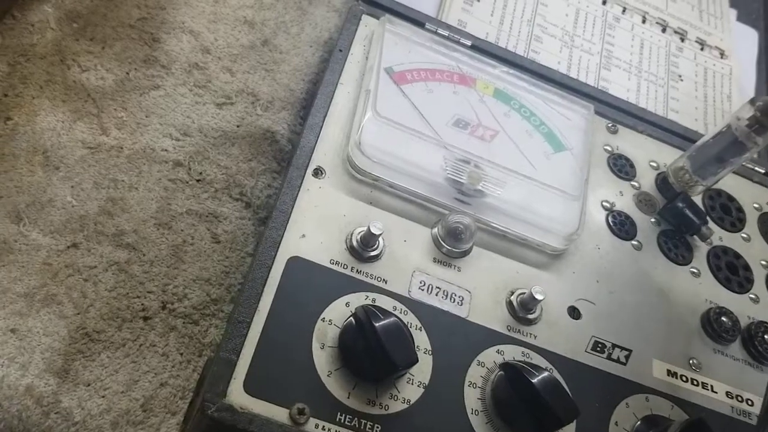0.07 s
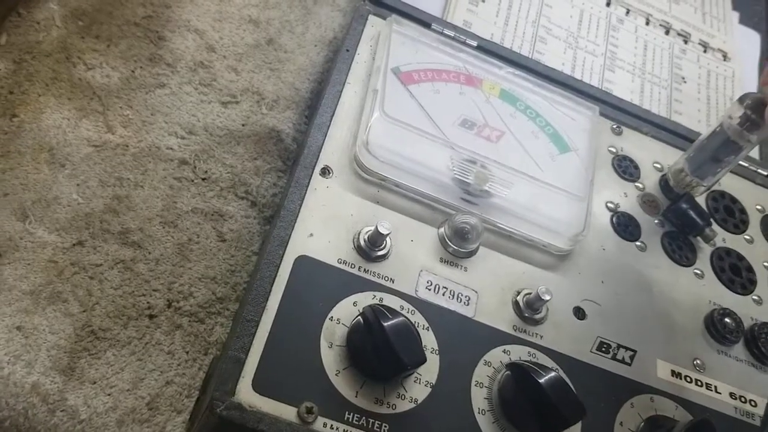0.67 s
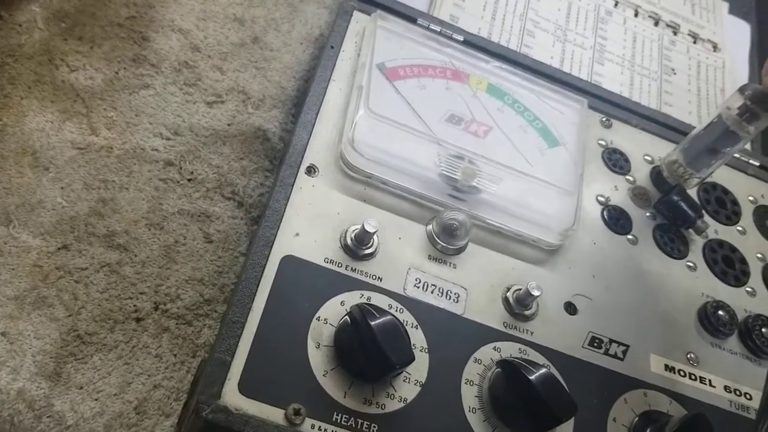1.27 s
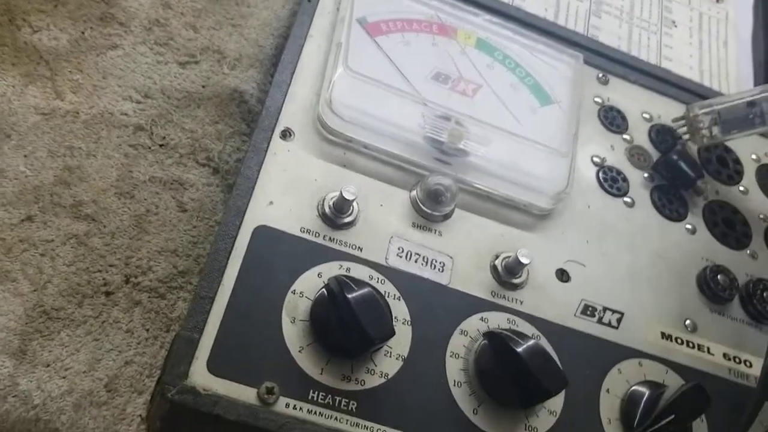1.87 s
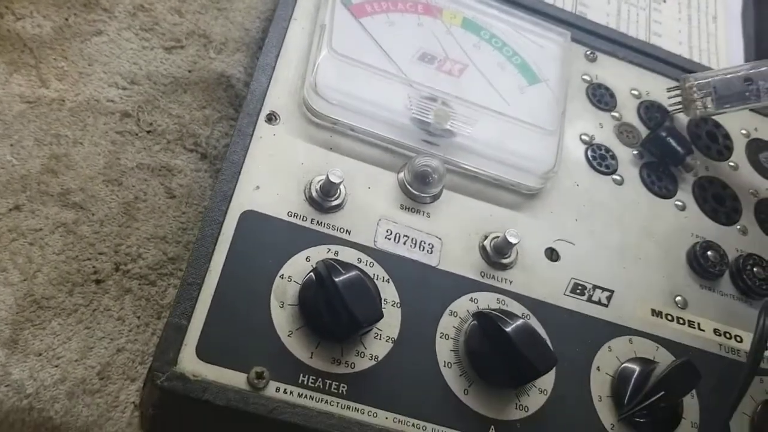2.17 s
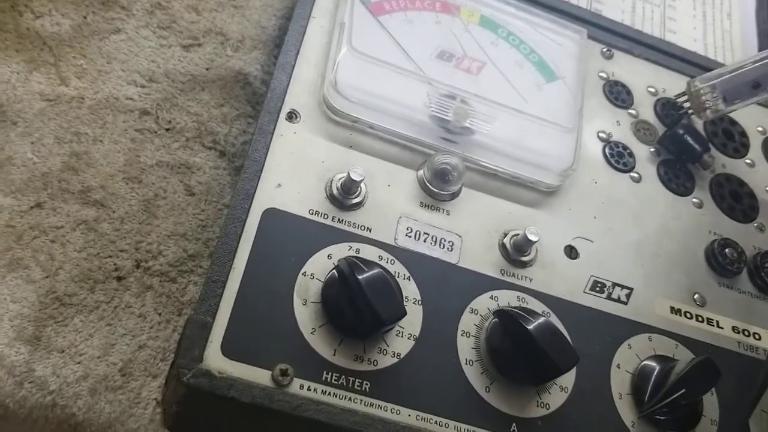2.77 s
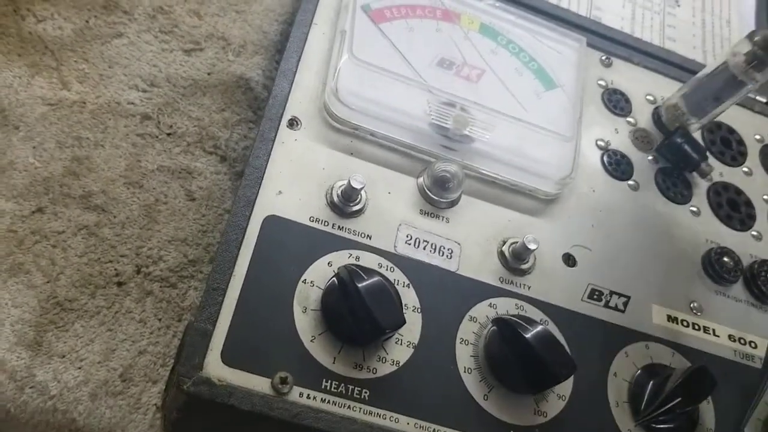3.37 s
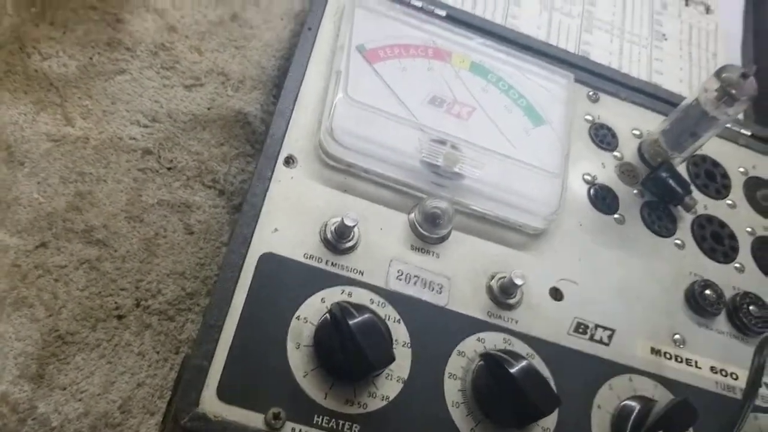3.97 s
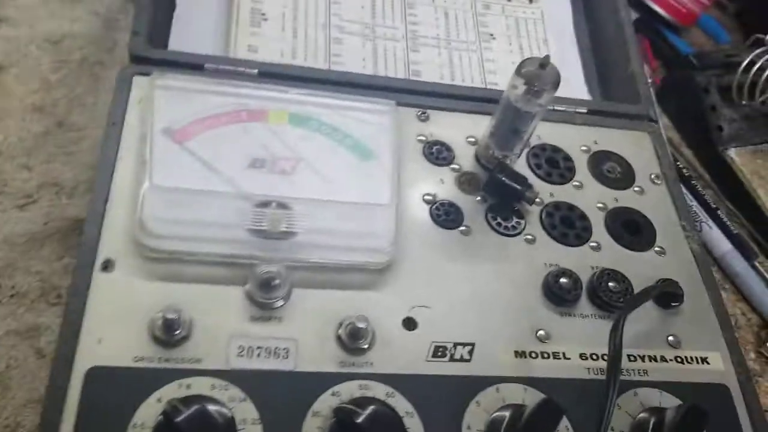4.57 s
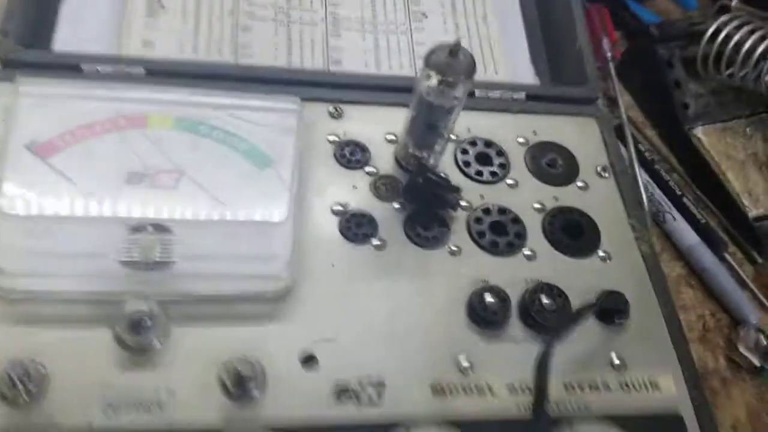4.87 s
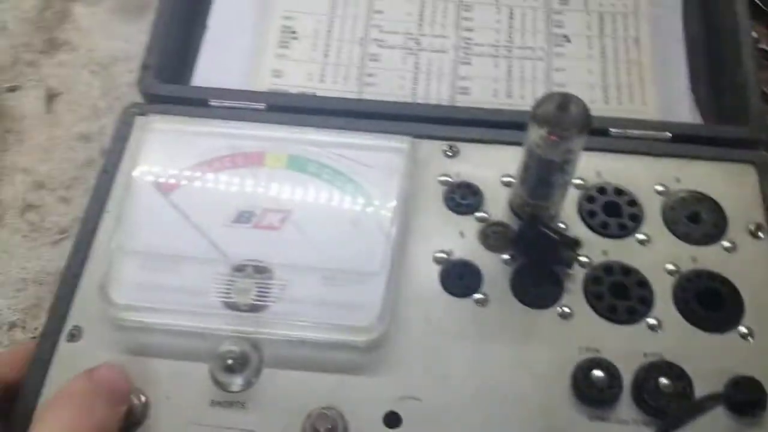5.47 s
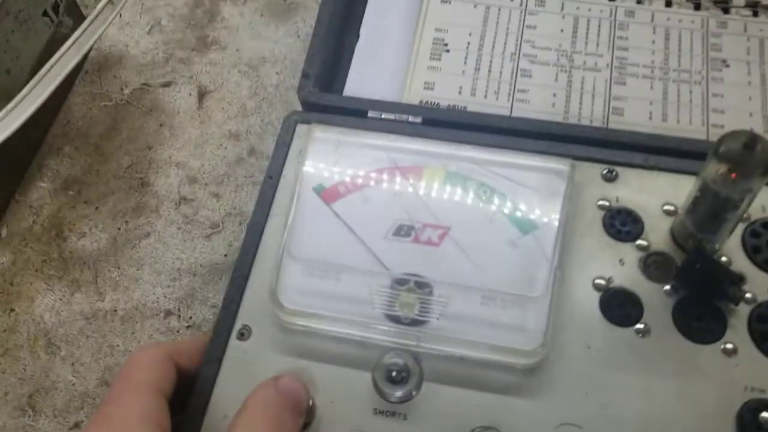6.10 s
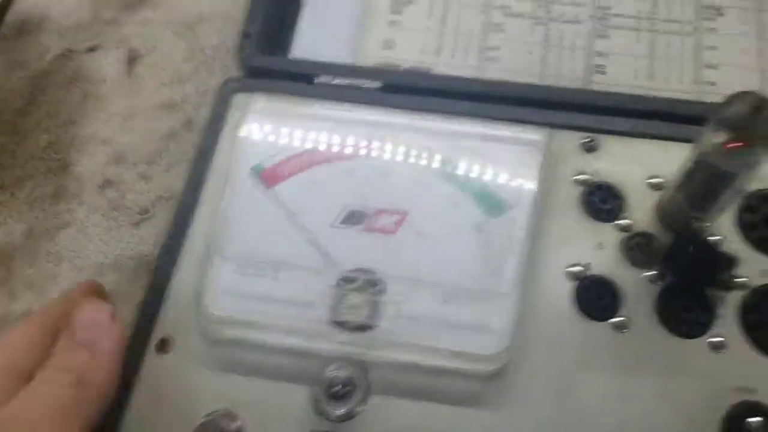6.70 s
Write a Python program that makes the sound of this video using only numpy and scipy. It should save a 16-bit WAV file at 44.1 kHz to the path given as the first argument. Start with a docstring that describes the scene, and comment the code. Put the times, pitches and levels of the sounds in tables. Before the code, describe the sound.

Small, uneven metallic clicks and hollow taps come from a glass valve's pins feeling for a socket, close up in a small room, over a quiet electrical hum. Soft finger rustle on the hand-held microphone builds into a brief cluster of loud pops on the left side. Afterwards a sprung button on the tester snaps with a dull thud, and about a second later gives a sharper clack, its spring buzzing and its stem scraping.

```python
"""A valve tester hums on a workbench while a hand feels for a socket with the pins of a glass valve.
For 4 s the pins tick, knock and skid on the panel; three times one slips off an edge and pings.
From about 1.5 s fingers slide on the hand-held stereo microphone; near 4.9 s they bump its left port.
At 5.5 s a thumb lands on the case with one snap of a sprung push button.
At 6.5 s the button clacks, its spring sizzles and its stem scrapes."""
import sys
import numpy as np
from scipy import signal
from scipy.fft import rfft, irfft, next_fast_len
from scipy.io import wavfile

SR = 44100
rng = np.random.default_rng(int(sys.argv[2]) if len(sys.argv) > 2 else 0)


def generate_wav(sig):
    """Save sig (samples, or channels by samples) to the path in sys.argv[1] as 16-bit PCM at SR."""
    pcm = np.round(np.clip(np.atleast_2d(sig).T, -1, 1) * 32767).astype(np.int16)
    wavfile.write(sys.argv[1], SR, pcm)


N = 297051
TIME_S = np.arange(N) / SR
HIT_S = TIME_S[:SR // 3]

# Ring of the button's metal. Each row: frequency in Hz, relative level in dB.
BUTTON_SPECTRUM = [(300, -22), (900, -9), (1400, -20), (2100, 4.5), (3000, 8.5), (5600, 6), (7200, 7),
                   (8800, -33), (11500, -9), (14000, -16), (15500, 4)]


def from_db(db):
    """Decibels to gain."""
    return 10 ** (np.asarray(db) / 20)


def at_hz(points, hz):
    """Interpolate on a log-frequency axis."""
    points_hz, values = np.transpose(points)
    return np.interp(np.log(hz + 1), np.log(points_hz), values)


def in_time(rows):
    """A curve's columns at every sample."""
    times_s, *columns = np.transpose(rows)
    return [np.interp(TIME_S, times_s, column) for column in columns]


def noise(spectrum, size=N):
    """Coloured noise, rms 1. Each spectrum row: frequency in Hz, relative level in dB."""
    padded = next_fast_len(size)
    gain = from_db(at_hz(spectrum, np.fft.rfftfreq(padded, 1 / SR)))
    x = irfft(rfft(rng.standard_normal(padded)) * gain, padded)[:size]
    return x / x.std()


def resonance(hz, width_hz):
    """Friction noise in one narrow band whose centre may move, rms 1."""
    lowpass = signal.butter(2, width_hz / 2, fs=SR, output="sos")
    slow = signal.sosfilt(lowpass, rng.standard_normal((2, N)))
    phase = 2 * np.pi * np.cumsum(hz * np.ones(N)) / SR
    x = slow[0] * np.cos(phase) + slow[1] * np.sin(phase)
    return x / x.std()


def flutter(rate_hz, depth_db):
    """Randomly wandering gain."""
    steps = rng.standard_normal(4096)
    return from_db(depth_db * np.interp(TIME_S * rate_hz, np.arange(len(steps)), steps))


def swell(at_s, attack_s, hold_s, release_s, db):
    """Stroke gain: rises 20 dB per attack until at_s, holds, falls 20 dB per release."""
    decades = np.maximum((at_s - TIME_S) / attack_s, (TIME_S - at_s - hold_s) / release_s)
    return from_db(db - 20 * np.clip(decades, 0, 10))


def fade(t60_s):
    """Exponential decay after a hit."""
    return np.exp(-np.log(1000) * HIT_S / t60_s)


def ring(hz, t60_s):
    """One damped mode."""
    return np.sin(2 * np.pi * hz * HIT_S) * fade(t60_s)


def burst(spectrum, t60_s):
    """Crowded modes dying together, peak near 1."""
    return noise(spectrum, size=len(HIT_S)) * fade(t60_s) / 2


def placed(x, right_db):
    """Stereo: left port at full level, right port offset."""
    return x * from_db([[0], [right_db]])


def add(track, at_s, sound):
    """Mix a sound into a track."""
    start = round(at_s * SR)
    track[..., start:start + sound.shape[-1]] += sound[..., :N - start]


def workshop(x, wet_db, build_s):
    """Add dense bench and room reflections, different at each port."""
    # Each row: frequency in Hz, t60 in seconds.
    decay_times = [(100, 0.31), (400, 0.2), (1000, 0.27), (2700, 0.33), (7000, 0.21), (15000, 0.19)]
    hz = np.fft.rfftfreq(len(HIT_S), 1 / SR)
    white = rfft(rng.standard_normal((2, len(HIT_S))))
    edges_hz = np.geomspace(90, 18000, 9)
    tail = np.zeros((2, len(HIT_S)))
    for low_hz, high_hz in zip(edges_hz, edges_hz[1:]):
        band = irfft(white * ((hz >= low_hz) & (hz < high_hz)), len(HIT_S))
        tail += band * fade(at_hz(decay_times, np.sqrt(low_hz * high_hz)))
    tail *= 1 - np.exp(-HIT_S / build_s)
    tail /= np.sqrt(np.sum(tail ** 2) / 2)
    return x + from_db(wet_db) * signal.fftconvolve(x, tail, axes=1)[:, :N]


def background():
    """Room rumble, mostly common to both ports, and each port's own hiss."""
    # Each row: frequency in Hz, relative level in dB.
    rumble_spectrum = [(15, -11), (30, -6), (48, 4.5), (80, 4), (110, -3.5), (160, -10.5), (250, -23.5),
                       (400, -25), (800, -42), (2000, -73.5)]
    left_spectrum = [(200, -9), (1000, -12.5), (2700, -11.5), (3600, -10), (4600, -12), (5400, -2.5),
                     (6300, 1.5), (7200, -4.5), (8300, -25.5), (9500, -29.5), (11000, -11.5), (12500, -7),
                     (14500, -13.5), (16000, -9.5)]
    right_spectrum = [(200, 3.5), (1000, 3), (3000, -2), (4500, -6.5), (6800, -7.5), (8300, -16.5),
                      (9800, -14), (12000, 0), (16000, -4.5)]
    # The left hiss dips after the grip changes. Each row: time in seconds, rms level in dB.
    left_levels = [(0, -62), (1.2, -62), (4.9, -60.5), (5.3, -62), (6, -65), (6.74, -62.5)]
    common = placed(from_db(-57) * noise(rumble_spectrum), right_db=-2.5)
    diffuse = from_db(-65) * np.array([noise(rumble_spectrum) for port in "LR"])
    left_db, = in_time(left_levels)
    hiss = np.array([from_db(left_db) * noise(left_spectrum), from_db(-74) * noise(right_spectrum)])
    return common + diffuse + hiss


def transformer_hum(mains_hz=59.82):
    """The core flexes twice per mains cycle; each partial wanders as the microphone moves."""
    # Each row: multiple of the mains frequency, rms level in dB.
    partials = [(1, -73), (2, -55), (3, -72.5), (4, -75.5), (5, -74), (6, -84), (7, -86), (8, -82.5),
                (10, -98.5), (12, -92)]
    hum = np.zeros(N)
    for multiple, db in partials:
        wander = flutter(1.475, depth_db=1.1 if multiple == 2 else 2.6)
        hum += from_db(db) * wander * np.sin(2 * np.pi * (multiple * mains_hz * TIME_S + rng.random()))
    return placed(np.sqrt(2) * hum, right_db=-6)


def microphone_bumps():
    """A fingertip cracks on the port, pops its cavity, pushes in air and drags; no room is heard."""
    # Each row: start in seconds, thump in dB, pop in dB, pop in Hz, crack in dB, left minus right in dB.
    bumps = [(4.75, -47, -49.5, 600, -46, -18), (4.7618, -52, -42, 592, -30, 16),
             (4.7662, -36, -31, 400, -27, 24), (4.7678, -35, -37, 600, -24, 22),
             (4.7726, -23.5, -28, 496, -23.5, 21), (4.877, -41.5, -30.5, 704, -14, 23),
             (4.8808, -34, -7, 660, -12, 25.5), (4.882, -16, -15, 913, -5.5, 22.5),
             (4.8986, -35, -28, 350, -11.5, 22), (4.9009, -36, -6.5, 390, -24, 19.5),
             (4.9037, -18, -4.5, 1403, -13, 29), (4.9056, -23, -9, 380, -30, 24),
             (4.907, -19, -10.5, 737, -24, 25), (4.9167, -4.5, -8.5, 800, -2, 29),
             (5.0645, -70, -32.5, 3420, -45, -5.5), (5.111, -75, -45, 5200, -52, -8)]
    # Each row: frequency in Hz, relative level in dB.
    crack_spectrum = [(400, 0), (2000, 3), (3700, 2.5), (5200, 4.5), (7200, 6), (8300, -23), (10000, -18),
                      (13500, -2.5), (16000, -20)]
    judder_spectrum = [(60, -18.5), (250, -2.5), (700, -5.5), (1500, -19), (4000, -35)]
    thump_hz, t60_cycles = 133, 3.6
    seal_lag_s = 0.00155  # the pad seals the port just after the nail's crack
    drag_from_s, drag_to_s, drag_end_db, rise_db_per_s = 4.875, 4.9175, -35.5, 133.5
    hits = np.zeros((2, N))
    for at_s, thump_db, pop_db, pop_hz, crack_db, left_db in bumps:
        crack = burst(crack_spectrum, t60_s=0.004)
        crack *= from_db(crack_db) / abs(crack).max()
        pop = from_db(pop_db) * ring(pop_hz, t60_cycles / pop_hz)
        thump = from_db(thump_db) * ring(thump_hz, t60_cycles / thump_hz)
        add(hits, at_s, placed(pop + crack, -left_db))
        add(hits, at_s + seal_lag_s, placed(thump, -left_db))
    touching = (TIME_S > drag_from_s) & (TIME_S < drag_to_s)
    drag_db = drag_end_db - rise_db_per_s * abs(drag_to_s - TIME_S)
    drag = touching * from_db(drag_db) * noise(crack_spectrum)
    hardest_press = swell(4.9025, attack_s=0.0033, hold_s=0.0092, release_s=0.012, db=-21)
    judder = hardest_press * noise(judder_spectrum)
    port_leak = signal.butter(1, 45, "high", fs=SR, output="sos")
    return signal.sosfilt(port_leak, hits + placed(drag + judder, right_db=-29.5))


def stick_slip(slips_per_s=45, slip_db=3):
    """Friction gain: steady sliding plus uneven scratches as skin ridges catch and let go."""
    slips = (rng.random(N) < slips_per_s / SR) * rng.random(N)
    return 0.83 + from_db(slip_db) * signal.fftconvolve(slips, fade(t60_s=0.012))[:N]


def finger_rub():
    """Skin slides on the housing: grainy hiss, low rustle and a whistle from the left port's resonance."""
    # Each row: time, attack, hold and release in seconds, then hiss, rustle,
    # right-port hiss offset and whistle in relative dB.
    strokes = [(1.598, 0.34, 0.16, 0.15, -48.5, -95, -10.5, -54.5),
               (1.92, 0.079, 0.018, 0.27, -53.5, -67, -13, -69),
               (2.857, 0.3, 0.095, 0.5, -53.5, -73, -12.5, -61.5),
               (3.953, 0.046, 0.068, 0.26, -49, -65.5, -7.5, -61),
               (4.116, .03, 0.017, 0.043, -54.5, -69, -10, -77),
               (4.208, 0.04, 0.027, 0.08, -52.5, -60, -16, -80), (4.33, .03, .03, .05, -57, -68, -16, -80),
               (4.42, 0.047, 0.053, 0.2, -42, -71, -10, -55),
               (4.647, 0.052, 0.16, 0.082, -71.5, -51.5, -13, -78),
               (4.854, 0.096, .02, 0.089, -49, -45.5, -5, -80),
               (4.998, 0.22, 0.066, 0.25, -62, -59, 1, -81), (6.44, 0.14, 0.07, 0.12, -60, -61.5, -1, -80)]
    # Each row: frequency in Hz, relative level in dB.
    left_spectrum = [(800, -49), (2000, -28), (3100, -28.5), (3800, -13.5), (5500, -7.5), (6800, -2.5),
                     (7700, -14), (9000, -21.5), (11000, -14.5), (13000, -15.5), (16000, -17.5)]
    right_spectrum = [(800, -26), (4000, -13.5), (5200, -3.5), (7000, 1), (8200, -2), (9500, -15),
                      (12000, -3.5), (16000, -12)]
    rustle_spectrum = [(25, -13.5), (75, 2), (160, -5), (300, -6), (600, -15.5), (1200, -26), (3000, -25),
                       (8000, -42), (16000, -53)]
    hiss, rustle, whistle = np.zeros((2, N)), np.zeros(N), np.zeros(N)
    for *timing, hiss_db, rustle_db, right_db, whistle_db in strokes:
        hiss += placed(swell(*timing, hiss_db - 3.5), right_db)
        rustle += swell(*timing, rustle_db)
        whistle += swell(*timing, whistle_db)
    whistle *= resonance(hz=6830, width_hz=600)
    grain = flutter(30, depth_db=1.5) * flutter(250, depth_db=1.3) * stick_slip()
    hiss *= grain * np.array([noise(left_spectrum), noise(right_spectrum)])
    rustle *= flutter(80, depth_db=3) * noise(rustle_spectrum)
    return hiss + placed(whistle, right_db=-22.5) + placed(rustle, right_db=-9)


def finger_scuff():
    """One stroke catches on the housing."""
    # Each row: frequency in Hz, relative level in dB.
    spectrum = [(400, -31), (800, -12), (1050, 2), (1600, -10.5), (2400, -2.5), (3500, -11), (8000, -35)]
    gain = swell(4.425, attack_s=0.018, hold_s=0.019, release_s=0.065, db=-55)
    return placed(gain * flutter(200, depth_db=2) * noise(spectrum), right_db=-13)


def housing_rub():
    """The shifting palm sets the microphone's hollow shell singing; the grip bends the pitch."""
    # Each row: time, attack, hold and release in seconds, level in dB, right-port offset in dB.
    shifts = [(4.03, .1, .08, .2, -74.5, -15), (4.206, .1, .05, .2, -71, -17),
              (4.735, 0.22, 0.16, .1, -60, -12), (4.987, 0.12, 0.087, 0.24, -59.5, 1),
              (5.544, 0.013, .012, .06, -54, -3), (6.42, 0.1, 0.097, .15, -65, 0)]
    # Each row: time in seconds, shell pitch in Hz.
    pitch_curve = [(4.1, 2077), (4.65, 2146), (5.05, 2200), (5.45, 2135), (6.45, 2100)]
    # Crowded upper modes. Each row: frequency in Hz, relative level in dB.
    upper_spectrum = [(1700, -20), (2400, -3), (3200, -4.5), (3700, -2), (4400, -0.5), (5000, -6),
                      (6500, -5), (9000, -24)]
    hz, = in_time(pitch_curve)
    pressure = sum(placed(swell(*timing, db), right_db) for *timing, db, right_db in shifts)
    pressure *= flutter(43, depth_db=2.5)
    shell = [resonance(hz, width_hz=320) + from_db(-2.5) * noise(upper_spectrum) for port in "LR"]
    return pressure * np.array(shell)


def knock(db, tilt_db_per_oct, hollow_db=0, t60_scale=1, hollow_hz=440):
    """A touch rings the panel: its spot favours modes near hollow_hz, hardness tilts, the hand damps."""
    # Panel and case modes. Each row: frequency in Hz, relative level in dB, free t60 in seconds.
    panel_modes = [(138, -12.5, 0.1), (238, -15, 0.06), (295.2, -2, 0.056), (361.5, 0, 0.047),
                   (443, -1.8, 0.062), (710, -7.5, 0.047), (767, -12.5, 0.037), (855, -15, 0.044),
                   (1108, -12, 0.033), (1211, -17.5, 0.05), (1368, -8, 0.035), (1445, -12, 0.034),
                   (1790, -17, 0.036), (2406, -16.5, 0.025)]
    # Brief drag after the touch. Each row: frequency in Hz, relative level in dB.
    grit_spectrum = [(100, 1), (230, 4.5), (450, 3.5), (520, -17), (630, -17), (730, 0), (950, -7.5),
                     (1150, -6), (1420, -4.5), (1580, -17), (2300, -12.5), (2900, -32), (6000, -42),
                     (16000, -62)]
    pivot_hz, hollow_width_oct, detune_share, scatter_db = 440, 0.27, 0.02, 1.85
    modes = np.array([
        from_db(mode_db) * ring(hz * (1 + detune_share * rng.standard_normal()), t60_s * t60_scale)
        for hz, mode_db, t60_s in panel_modes])
    modes *= 1 - fade(0.04)  # the sheet swings up
    modes /= abs(modes.sum(axis=0)).max()
    modes_hz = np.array(panel_modes)[:, 0]
    hollow = np.exp(-(np.log2(modes_hz / hollow_hz) / hollow_width_oct) ** 2)
    weights_db = tilt_db_per_oct * np.log2(modes_hz / pivot_hz) + hollow_db * hollow
    body = from_db(weights_db + scatter_db * rng.standard_normal(len(modes))) @ modes
    tilted = [(hz, grit_db + tilt_db_per_oct * np.log2(hz / pivot_hz)) for hz, grit_db in grit_spectrum]
    grit = np.array([burst(tilted, t60_s=0.15 * t60_scale) for port in "LR"])
    grit *= from_db(-4.5 + 1.3 * tilt_db_per_oct) * (1 - fade(0.0024))
    return from_db(db - 3.5) * (body + grit)


def from_panel(knocks, right_lead_s=0.00013):
    """Panel sound in the room; it reaches the shaded right port sooner and duller."""
    # Each row: frequency in Hz, right minus left in dB.
    right_shade = [(200, -2.5), (450, -1), (800, -4), (1400, -8), (2200, -11)]
    size = next_fast_len(N)
    hz = np.fft.rfftfreq(size, 1 / SR)
    response = from_db(at_hz(right_shade, hz)) * np.exp(2j * np.pi * hz * right_lead_s)
    right = irfft(rfft(knocks[1], size) * response, size)[:N]
    return workshop(np.array([knocks[0], right]), wet_db=-11, build_s=0.0011)


def thumb_thuds():
    """Flesh damps the case at once: each push is a few slow cycles and a dull knock."""
    # Each row: start in seconds, thud in dB, pitch in Hz, panel knock in relative dB.
    pushes = [(5.523, -37, 96.6, -59), (5.5402, -40, 315, -47), (5.5433, -28.5, 170, -46),
              (5.556, -29.5, 141, -38), (5.581, -29, 150.2, -51), (6.5698, -35, 167, -52),
              (6.586, -30.5, 202, -40.5), (6.6001, -37, 149, -50)]
    thuds, knocks = np.zeros(N), np.zeros((2, N))
    for at_s, db, hz, knock_db in pushes:
        add(thuds, at_s, from_db(db) * ring(hz, t60_s=0.031))
        add(knocks, at_s, knock(knock_db, tilt_db_per_oct=3))
    return workshop(placed(thuds, right_db=-3), wet_db=-11.5, build_s=0.0045) + from_panel(knocks)


def button_snaps():
    """The spring lets go in quick double snaps that jolt the panel."""
    # Each row: start in seconds, snap in relative dB, pitch in Hz, panel knock in relative dB.
    releases = [(5.5795, -16.5, 2050, -27), (6.5102, -15, 5800, -53), (6.515, -9.5, 5560, -49),
                (6.5238, -14.5, 5000, -40), (6.5603, -24.5, 4050, -37), (6.6, -30, 4460, -49),
                (6.6144, -33.5, 3980, -51)]
    rebound_s, rebound_loss_db, top_ring_hz = 0.0019, 5, 15200
    snaps, knocks = np.zeros((2, N)), np.zeros((2, N))
    for at_s, db, hz, knock_db in releases:
        spring = ring(hz, t60_s=0.0034) * (1 - fade(0.00081))
        for lag_s, loss_db in ((0, 0), (rebound_s, rebound_loss_db)):
            metal = np.array([burst(BUTTON_SPECTRUM, t60_s) for t60_s in (0.014, 0.016)])
            top_ring = from_db(-38) * ring(top_ring_hz * rng.uniform(1, 1.04), t60_s=0.02)
            add(snaps, at_s + lag_s, from_db(db - loss_db) * (top_ring + spring + from_db(-5) * metal))
        add(knocks, at_s, knock(knock_db, tilt_db_per_oct=3, hollow_db=7, t60_scale=0.81, hollow_hz=760))
    port_notch = signal.iirnotch(8800, Q=3.9, fs=SR)  # the ports are nearly deaf here
    snaps = signal.lfilter(*port_notch, snaps)
    return workshop(placed(snaps, right_db=-1), wet_db=-11.5, build_s=0.00077) + from_panel(knocks)


def spring_sizzle():
    """The coils sizzle after the snaps."""
    gain = swell(6.512, attack_s=0.011, hold_s=0.035, release_s=0.079, db=-44.5)
    return gain * flutter(600, depth_db=2.5) * np.array([noise(BUTTON_SPECTRUM) for port in "LR"])


def stem_scrape():
    """The button's stem slides along its collar."""
    # Each row: frequency in Hz, relative level in dB.
    spectrum = [(60, -20), (200, 2), (500, 1), (900, 1), (1400, -8), (2100, 2.5), (2800, -10), (3700, -3),
                (6200, -17), (8500, -21.5), (15500, -20)]
    gain = swell(6.545, attack_s=0.1, hold_s=0.069, release_s=0.15, db=-49.5)
    return gain * flutter(300, depth_db=3.5) * np.array([noise(spectrum) for port in "LR"])


def pin_skids():
    """Pins judder over the socket; one rings higher as it is pressed shorter, one drops into a hole."""
    # Each row: time, attack, hold and release in seconds, relative level in dB.
    skids = [(0.42, 0.05, 0.19, 0.12, -61.5), (0.653, .004, .006, 0.04, -60),
             (0.758, 0.08, 0.083, 0.13, -60), (3.153, .02, 0.051, .05, -60.5),
             (3.368, .02, 0.093, .06, -64)]
    # Each row: frequency in Hz, relative level in dB.
    socket_spectrum = [(150, 5.5), (400, 6), (540, -9), (640, 2), (750, 2.5), (1100, -8.5), (1400, -9),
                       (1600, -12), (2000, -8), (2800, -19), (6500, -26), (9000, -48), (16000, -35)]
    # Each row: time in seconds, pitch in Hz, level in dB.
    scrape_curve = [(0.42, 1855, -95), (0.55, 1916, -72), (0.68, 2076, -69.5), (0.81, 2250, -66),
                    (0.89, 2290, -88)]
    catch_at_s, catch_hz, catch_t60_s, catch_db = 0.6265, 660, 0.015, -31.5
    skid_gain = from_db(1.5) * sum(swell(*skid) for skid in skids)
    slips = skid_gain * flutter(160, depth_db=3.5) * noise(socket_spectrum)
    scrape_hz, scrape_db = in_time(scrape_curve)
    scrape_gain = from_db(scrape_db) * (TIME_S < scrape_curve[-1][0])
    slips += scrape_gain * flutter(120, depth_db=2.5) * resonance(scrape_hz, width_hz=500)
    catch = ring(catch_hz, catch_t60_s) + burst(socket_spectrum, catch_t60_s)
    add(slips, catch_at_s, from_db(catch_db) * catch * (1 - fade(0.0027)))
    return workshop(placed(slips, right_db=-10), wet_db=-11, build_s=0.0028)


def pin_pings():
    """A pin slips off an edge with a short glassy snap."""
    # Each row: start in seconds, high snap and lower ring in relative dB.
    plucks = [(1.9545, -27.5, -42), (2.9906, -31, -32.5), (3.9030, -37, -52)]
    # Each row: frequency in Hz, relative level in dB.
    snap_spectrum = [(9000, -34.5), (14500, -19), (15300, -4), (15650, 3), (16200, -8), (17500, -35)]
    pings = np.zeros(N)
    for at_s, high_db, low_db in plucks:
        high = from_db(high_db + 6.5) * burst(snap_spectrum, t60_s=0.017)
        low = from_db(low_db - 1.5) * ring(hz=5640, t60_s=0.015)
        add(pings, at_s, (high + low) * (1 - fade(0.005)))
    return workshop(placed(pings, right_db=-18), wet_db=-19, build_s=0.003)


def pin_taps(graze_count=8, graze_span_s=1.8, graze_db=-57.5):
    """Pin after pin knocks the panel and ticks; faint grazes come as the hand feels about."""
    # Each row: start in seconds, knock in relative dB, tilt in dB per octave, tick in relative dB,
    # hollow boost in dB, t60 as a multiple of the free one.
    taps = [(0.022, -48, 0, -56, 3, 0.9), (0.08, -51, 3, -56, -3, 0.7), (0.135, -50, 3, -55, -3, 0.7),
            (0.1856, -39.5, 1.5, -43.5, -5, 0.66), (0.263, -41, -2, -48.5, 1, 1),
            (0.39, -37, 3, -36, -2.5, 0.67), (0.443, -36, 0, -49, -3.5, 0.81),
            (0.534, -31, 2.5, -34.5, -3.5, 0.42), (0.5976, -47.5, 2, -48, -1, 1.1),
            (0.653, -38, 2.5, -50, -2, 0.47), (0.7356, -41, 1.5, -51, -2, 0.75),
            (0.81, -41, 2, -46, 1.5, 0.65), (0.878, -41.5, -3.5, -52, -6, 0.56),
            (0.966, -36.5, -3, -34.5, -20, 0.39), (0.9721, -22.5, -0.4, -23, 2.5, 0.63),
            (1.186, -41, 1, -48.5, 1.5, 1.03), (1.411, -46.5, 1.5, -60, -0.5, 1.4),
            (1.4345, -38.5, 2.5, -52, 6.5, 0.92), (1.782, -49, 2, -46, -2, 0.89),
            (1.794, -28.5, 2, -48, 1, 0.83), (1.822, -42.5, 1, -56, 1, 1.5),
            (1.952, -46, -1.5, -49, 7, 1.1), (1.9754, -40, -.5, -63, 6.5, 0.7),
            (2.107, -40.5, 1, -48, 1.5, 0.98), (2.3, -45, -1.5, -54, 4, 1.34),
            (2.403, -38, -1, -62, 5, 0.88), (2.48, -48.5, -1.5, -62, 2.5, 1.1),
            (2.809, -50, 0, -65, 4, 0.83), (3.141, -40, 1, -39, -5, 1.5), (3.189, -44.5, -3, -50, -4, 1.2),
            (3.228, -45.5, 2, -51, 4, 0.59), (3.327, -26.5, -0.6, -36, 0, 0.61),
            (3.361, -46, 1.5, -55, -5, 0.91), (3.423, -39.5, 2, -48, -3, 0.85),
            (3.4343, -34.5, -.5, -48, -3, 0.6), (3.465, -45, 1, -50, -4, .8),
            (3.676, -44.5, -6.5, -45, -3, 0.92)]
    # Pins within one tap. Each row: mean lag in seconds, knock offset in dB, tick offset in dB.
    landings = [(0, 0.5, -0.5), (0.008, -15, -5), (0.03, -14.5, -34)]
    # Steel pin on a socket contact. Each row: frequency in Hz, relative level in dB.
    tick_spectrum = [(800, -16), (2000, 2.5), (4200, 0.5), (5500, 1.5), (6300, 9), (7400, 2), (9200, -40),
                     (11000, -8), (13500, -5), (16000, -3.5)]
    knocks, ticks = np.zeros((2, N)), np.zeros((2, N))
    for at_s, knock_db, tilt_db_per_oct, tick_db, hollow_db, t60_scale in taps:
        for lag_s, knock_offset_db, tick_offset_db in landings:
            land_s = at_s + lag_s * rng.uniform(0.8, 1.2)
            add(knocks, land_s, knock(knock_db + knock_offset_db, tilt_db_per_oct, hollow_db, t60_scale))
            tick = np.array([burst(tick_spectrum, t60_s) for t60_s in (0.027, 0.018)])
            add(ticks, land_s, from_db(tick_db + tick_offset_db) * tick)
    for at_s in graze_span_s * rng.random(graze_count):
        add(knocks, at_s, knock(graze_db, tilt_db_per_oct=0))
    return from_panel(knocks) + workshop(placed(ticks, right_db=-14.5), wet_db=-10, build_s=0.001)


def scene():
    """All sources at the two ports."""
    steady = transformer_hum() + background()
    handling = microphone_bumps() + finger_rub() + finger_scuff() + housing_rub()
    button = thumb_thuds() + button_snaps() + spring_sizzle() + stem_scrape()
    pins = pin_skids() + pin_pings() + pin_taps()
    return steady + handling + button + pins


def record(dry):
    """Steep low-pass at 15.9 kHz."""
    return signal.sosfilt(signal.ellip(10, 0.2, 80, 15900, fs=SR, output="sos"), dry)


dry = scene()
out = record(dry)
generate_wav(out)
```